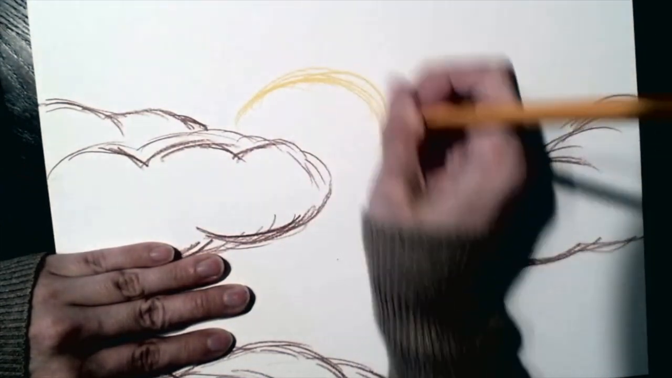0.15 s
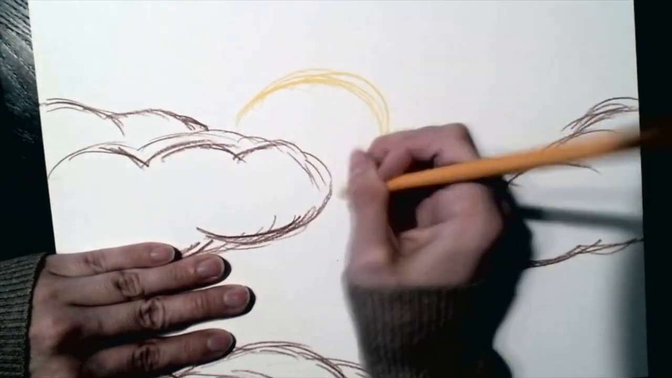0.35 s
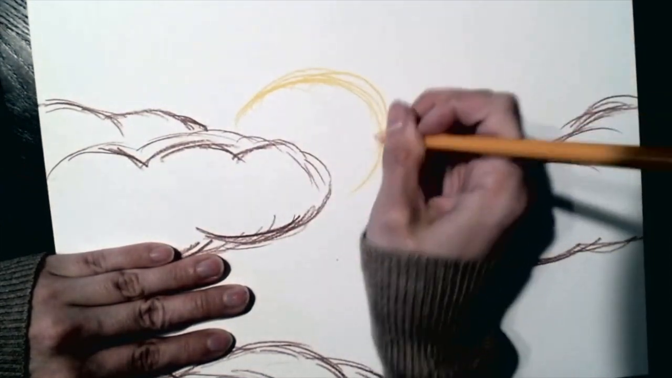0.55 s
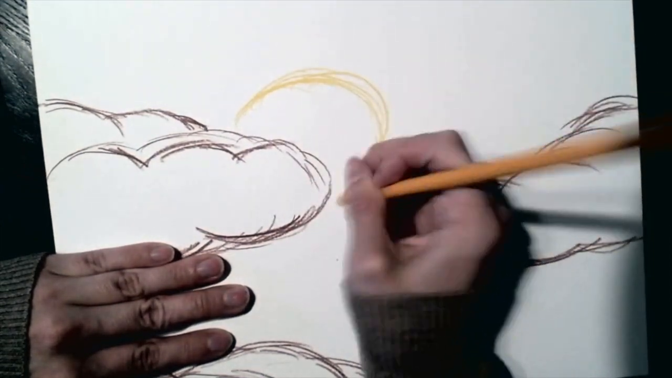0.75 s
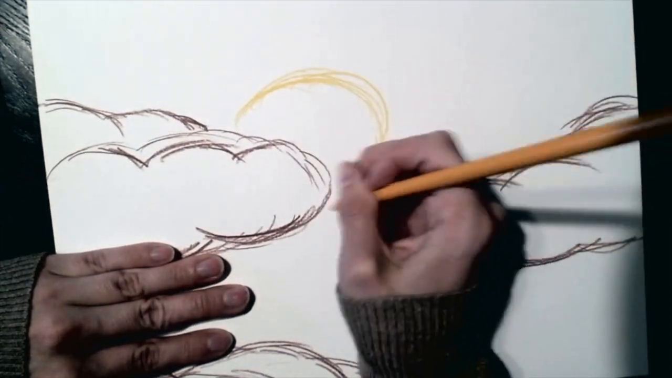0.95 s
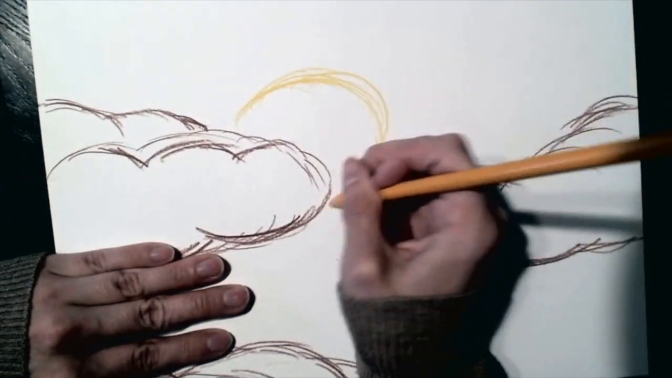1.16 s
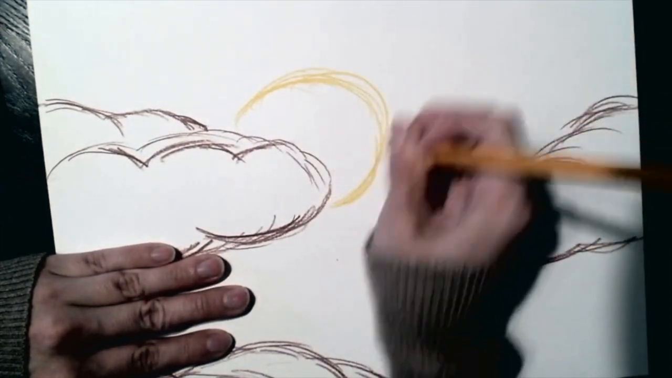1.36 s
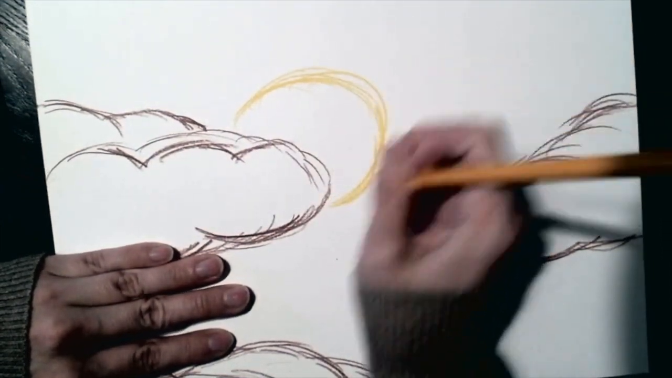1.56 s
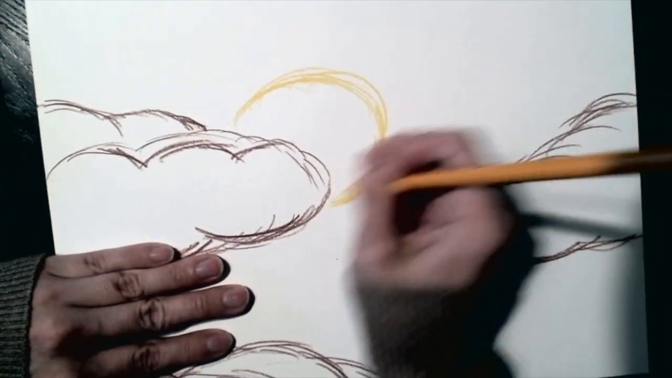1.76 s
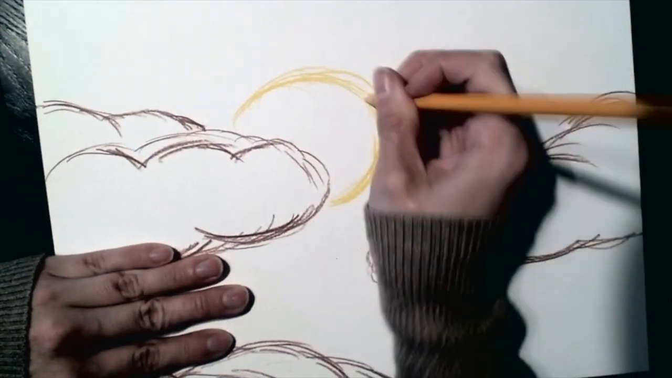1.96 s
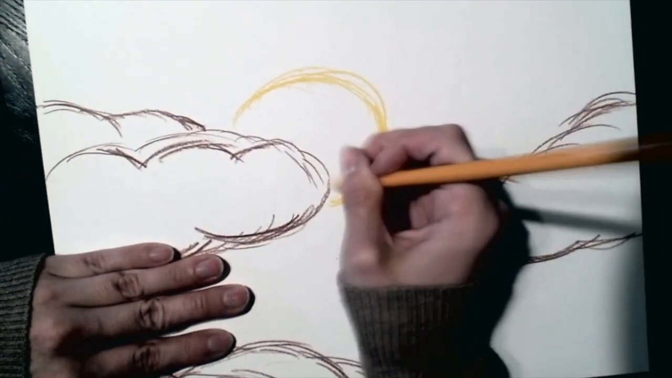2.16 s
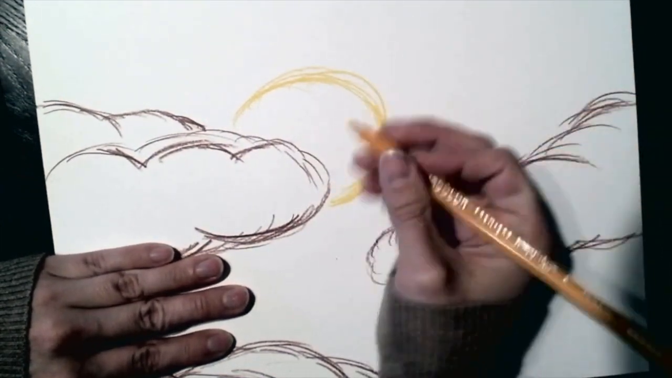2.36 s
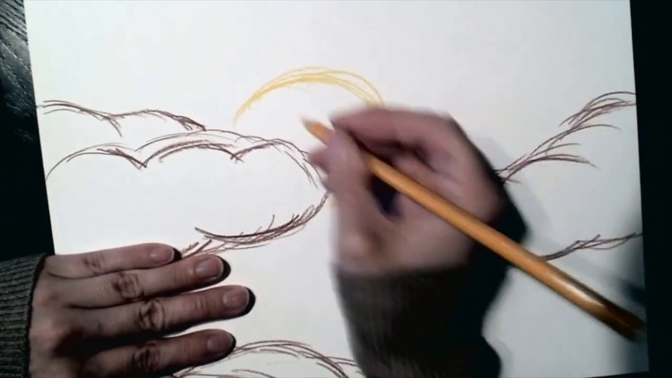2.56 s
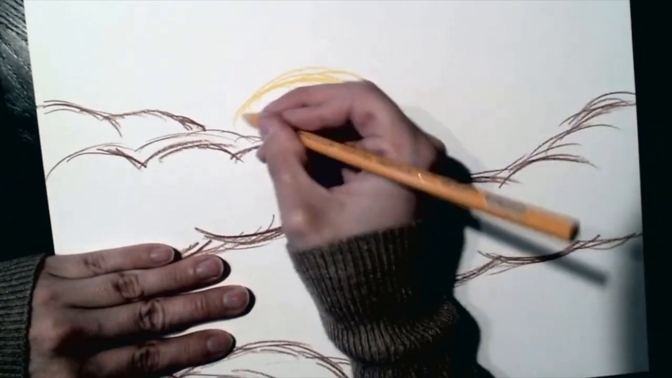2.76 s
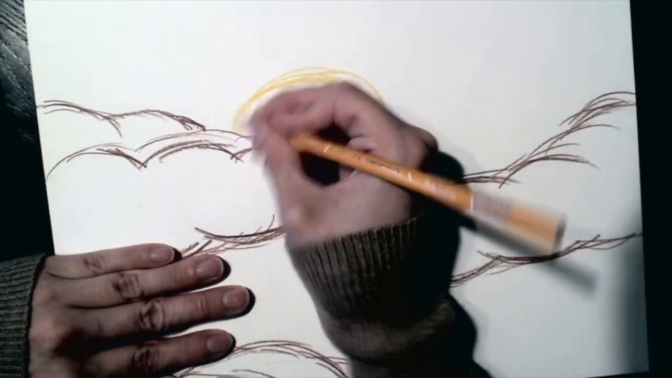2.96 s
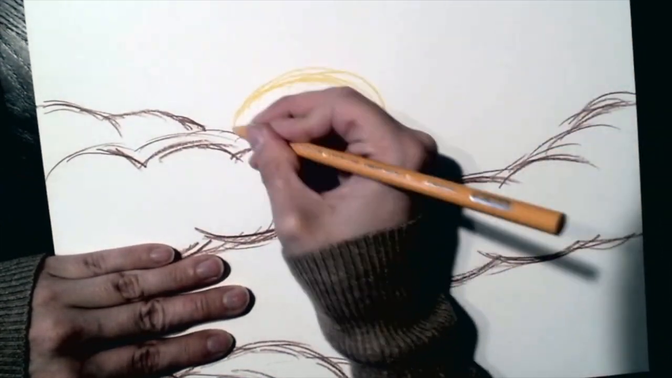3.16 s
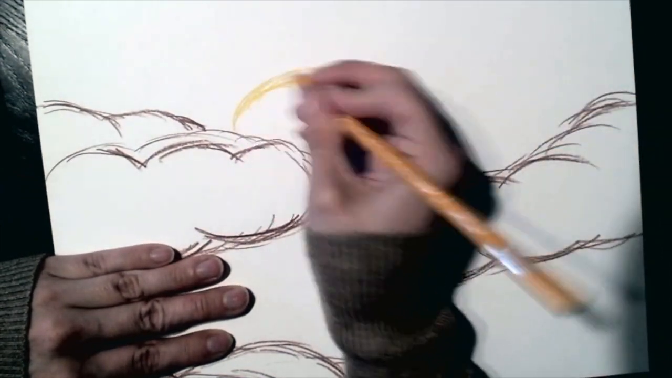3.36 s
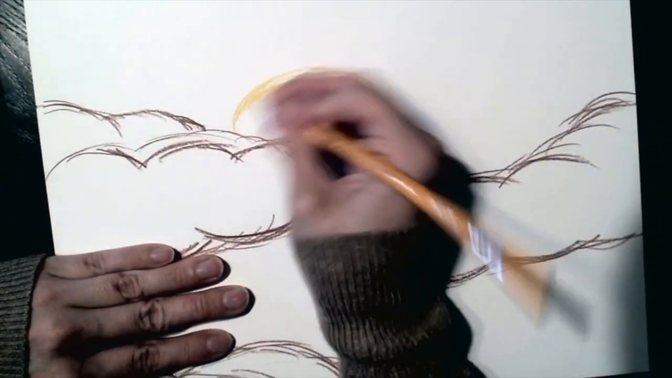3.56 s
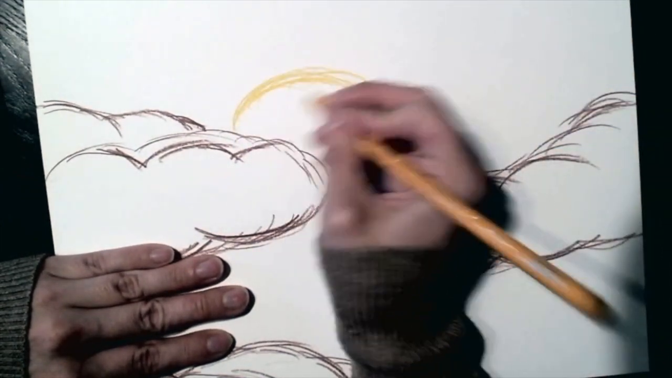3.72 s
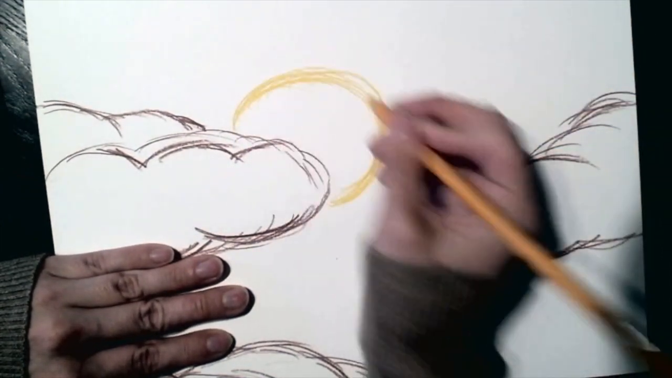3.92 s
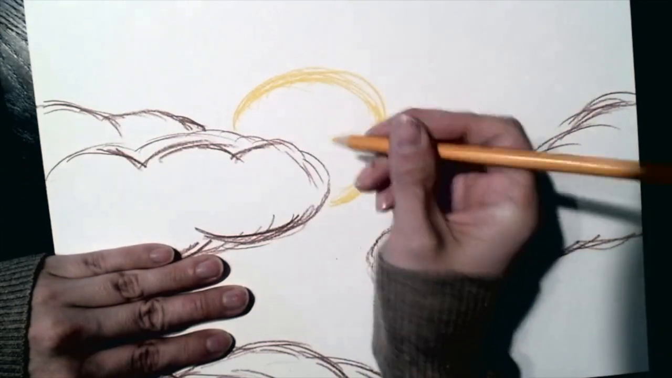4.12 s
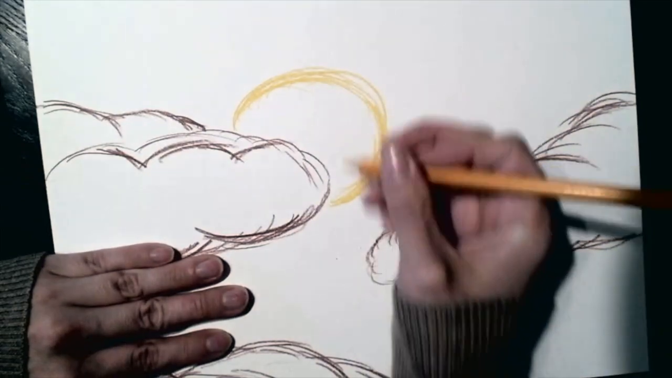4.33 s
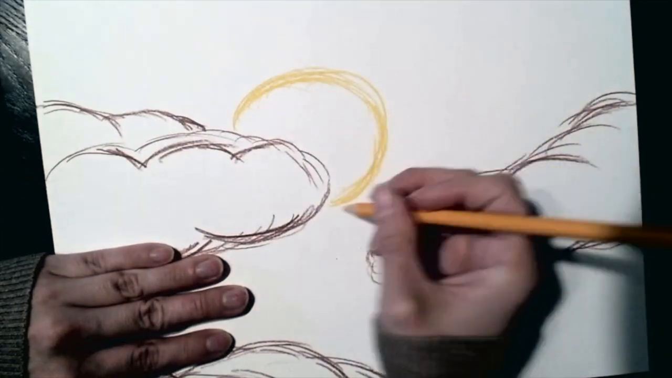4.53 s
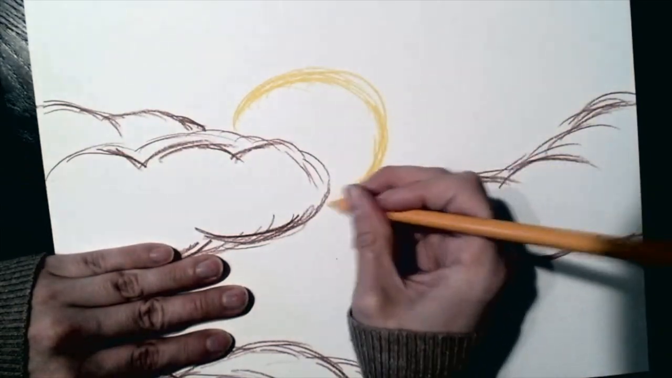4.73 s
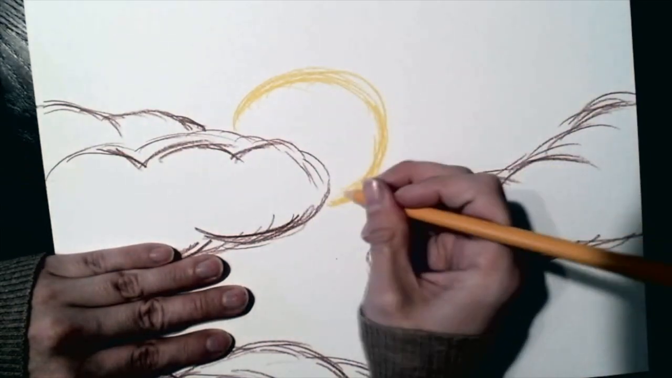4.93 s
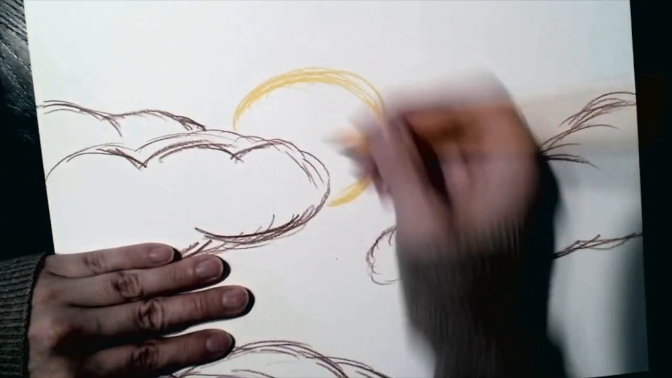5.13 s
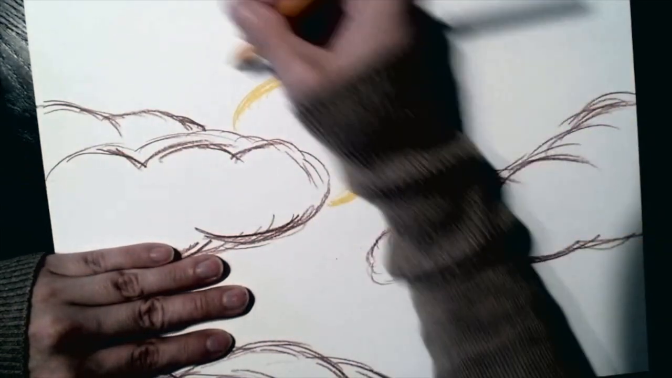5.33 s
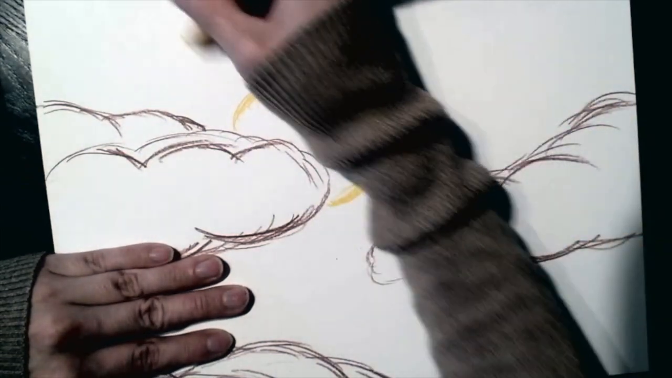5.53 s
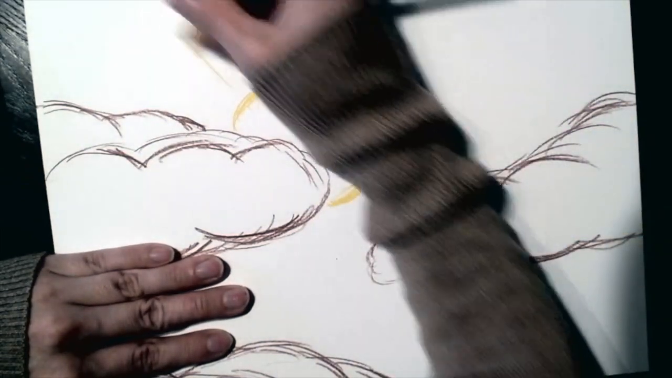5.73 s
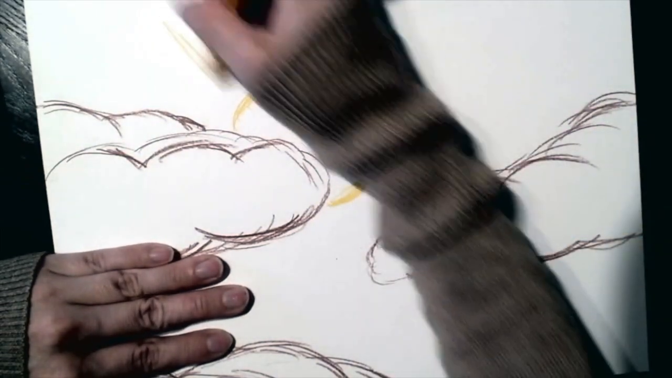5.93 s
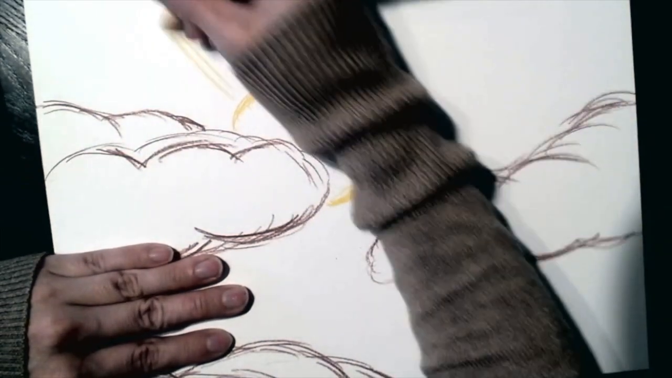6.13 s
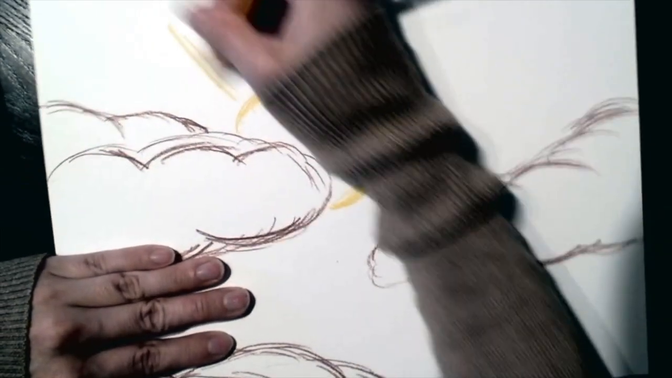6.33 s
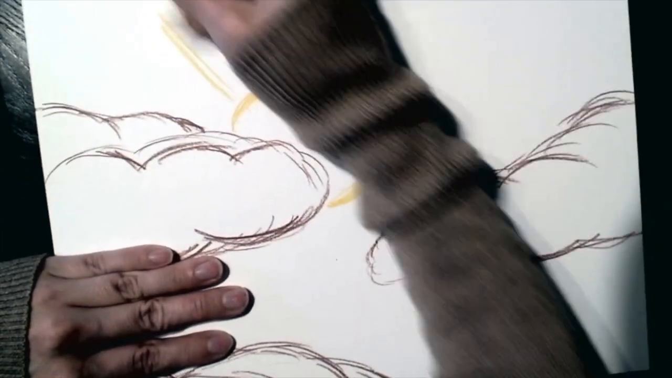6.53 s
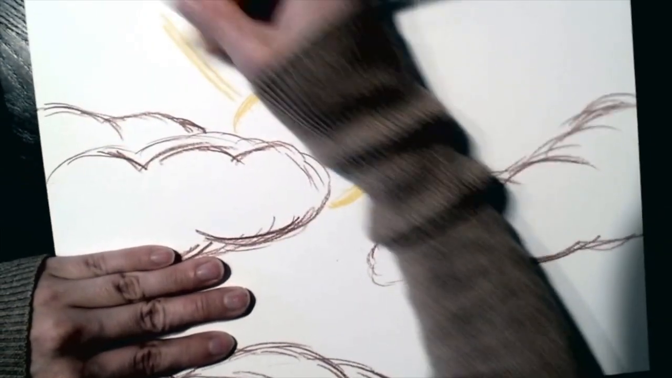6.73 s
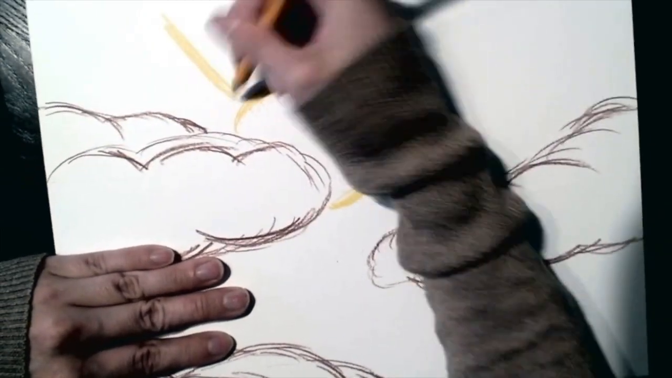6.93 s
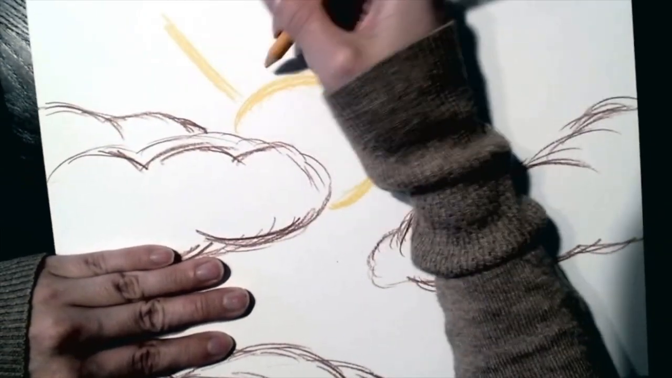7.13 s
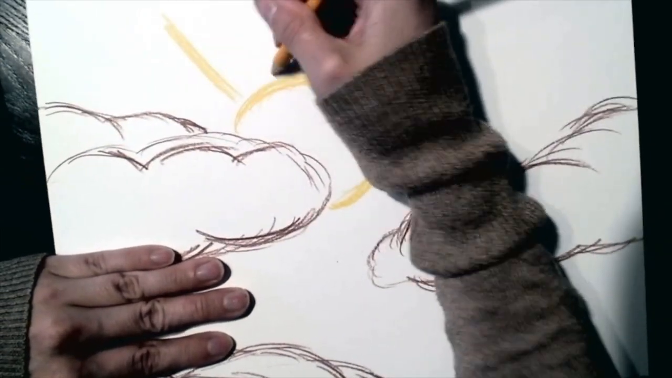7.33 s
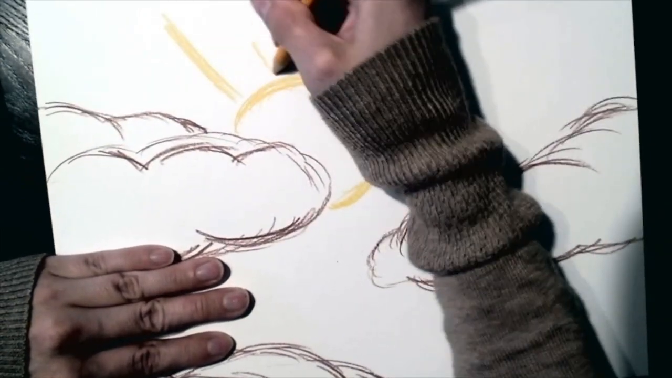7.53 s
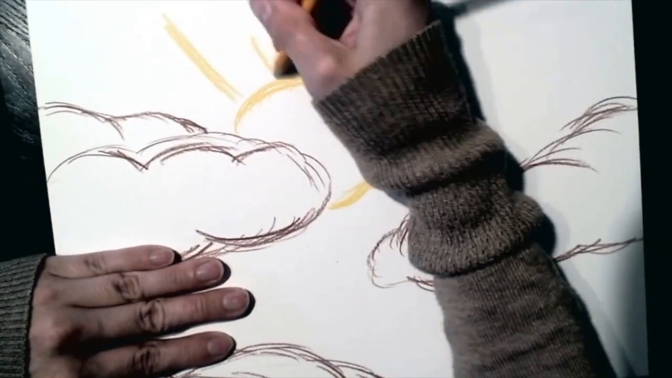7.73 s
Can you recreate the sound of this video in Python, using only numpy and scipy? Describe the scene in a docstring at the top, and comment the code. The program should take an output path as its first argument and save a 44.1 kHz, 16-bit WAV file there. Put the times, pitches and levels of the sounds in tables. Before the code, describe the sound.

A coloured pencil draws on paper over a board, heard close in a quiet room with a faint, low appliance hum throughout. For the first two seconds or so the tip lands with light knocks and sketches about seven arcs, each a grainy hiss that swells and fades over a slight rumble of the board. Hand and sleeve brush softly across the sheet. From about 2.9 to 4 seconds come four more strokes with a few taps, then a lull with only tiny ticks and one faint stroke. Around 5.3 seconds the forearm settles with a soft, deep thud. From 5.5 to 7 seconds the pencil shades briskly to and fro, the loudest strokes, the lead chattering in short rough bursts. After a brief pause, a tap at 7.3 seconds starts shorter, quicker, lighter shading that runs until nearly 8 seconds.

```python
"""A coloured pencil draws on a sheet of paper lying on a board, in a quiet room.
It lands with a knock and sketches arcs, then shades to and fro. Each stroke gathers speed and slows
again: the tip hisses over the fibres, the board rumbles and, in some fast strokes, the lead judders.
Hand and sleeve brush the paper in between, the forearm settles softly, and an appliance hums."""
import sys
import numpy as np
from scipy import signal
from scipy.fft import rfft, irfft
from scipy.io import wavfile

SR = 44100
rng = np.random.default_rng(int(sys.argv[2]) if len(sys.argv) > 2 else 0)


def dump_mix(stems):
    """Bounce the given channels to the path in sys.argv[1] as a 16-bit WAV at rate SR."""
    frames = np.atleast_2d(stems).T  # one column per channel
    limited = np.clip(frames, -1, 1)  # hard clip at full scale
    pcm = np.round(limited * 32767).astype(np.int16)
    wavfile.write(sys.argv[1], SR, pcm)


N = 347508
TIME = np.arange(N) / SR

# Mains hum beating with a motor. Each row: pitch in Hz, level in dB before the ride, wander in radians.
HUM_TONES = [(119.4, -55.5, 0.34), (112, -65, 0.77), (163.8, -71, 1.2), (229.8, -61.5, 0.25),
             (239.3, -68, 1.2)]
# The level of the background hum and low room noise rises and falls, louder around the strokes.
# Each row: time in seconds, gain in dB.
BACKGROUND_RIDE = [(0, -1), (0.9, 0), (1.1, -8.5), (1.45, 0.5), (2.25, 2), (2.45, -4.5), (3.45, -4),
                   (3.7, -1), (4.0, -2.5), (4.2, -7), (5.5, -5), (6.0, 2), (6.9, 3), (7.2, -4.5),
                   (7.88, -1.5)]
# Tone of the still room and of the sliding hand. Each row: frequency in Hz, relative level in dB.
ROOM_COLOUR = [(25, -26), (50, -9), (95, 2.5), (145, 1.5), (240, -2), (320, -4.5), (440, -10), (620, -28.5),
               (850, -23), (1700, -25), (3200, -31), (6500, -34.5), (12500, -43), (14500, -73.5)]
SLIDE_COLOUR = [(300, 3.5), (700, 5), (1300, 8), (2200, 7.5), (3200, 3.5), (7000, 3), (10000, -4),
                (13000, -7), (15000, -38)]
# The hand shifts. Each row: start and end in seconds, fastest point as a share of the move, level in dB.
HAND_SLIDES = [(-0.04, 0.132, 0.39, -67), (0.31, 0.525, 0.26, -69), (0.74, 0.865, 0.5, -69.0),
               (2.12, 2.47, 0.24, -71.5), (2.42, 2.777, 0.76, -71), (3.12, 3.17, 0.7, -76),
               (3.36, 3.518, 0.74, -72), (3.674, 3.773, 1, -66), (3.93, 4.13, 0.14, -73.5),
               (4.303, 4.41, 0.54, -78.5), (4.942, 5.07, 0.6, -77.6), (5.263, 5.522, 0.56, -70),
               (6.864, 7.18, 0.1, -68)]
# Pencil strokes. Each row: start and end in seconds, hardest point as a share of the stroke,
# swell (below 1 flat, above 1 pointed), hiss and rumble in dB before the grip's trims.
STROKES = [(0.112, 0.349, 0.74, 0.74, -59, -51.5), (0.507, 0.764, .62, 0.91, -62, -61),
           (0.85, 1.09, 0.37, 1.3, -65, -63.5), (1.147, 1.473, 0.88, 2.37, -59.5, -52.5),
           (1.465, 1.705, 0.33, 0.46, -59.5, -49.5), (1.703, 1.932, 0.82, 0.38, -58, -51),
           (1.925, 2.184, 0.63, .6, -59.5, -52), (2.904, 3.052, 0.56, 1.3, -66, -47),
           (3.195, 3.405, 0.56, 1.4, -65.5, -48), (3.476, 3.696, 0.52, 1.24, -61, -43.5),
           (3.774, 4, 0.21, 0.61, -61, -52), (4.735, 4.87, 0.3, 0.89, -74.5, -67),
           (5.517, 5.652, 0.5, 0.48, -60.5, -49.5), (5.619, 5.819, 0.89, 1.63, -56.5, -46),
           (5.81, 5.966, 0.52, 0.62, -54.5, -42.5), (5.94, 6.143, 0.79, 1.03, -54.5, -45.5),
           (6.135, 6.31, 0.26, 1.1, -53.5, -42.5), (6.296, 6.465, 0.57, 1.17, -52.5, -43),
           (6.447, 6.647, 0.3, 1.33, -55, -40), (6.62, 6.786, 0.54, 1.3, -54.5, -45.5),
           (6.77, 6.969, 0.17, 2.03, -54.5, -46), (7.317, 7.416, 0.72, 0.88, -66.5, -53.5),
           (7.411, 7.548, 0.092, 1.1, -64, -53.5), (7.527, 7.629, 0.47, 1.25, -63, -49),
           (7.623, 7.745, 0.18, 1.4, -60.5, -49.5), (7.727, 7.833, 0.64, 1.34, -63, -46.5),
           (7.83, 7.905, 0.22, 0.65, -59.5, -49.5)]
# Tone of the friction for each grip: arcs with the side and the top of the lead, long and short shading.
# Each row: frequency in Hz, relative level in dB.
SIDE_ARC_COLOUR = [(650, 4), (880, 0), (1000, 14.5), (1400, 1), (1650, 10.5), (2100, 11), (2650, 3),
                   (3100, -2.5), (4300, 2), (7000, -1.5), (8500, -7), (10300, -3), (13000, -12.5),
                   (15700, -41)]
TOP_ARC_COLOUR = [(930, -2), (1100, 4.5), (1520, 13), (1680, 2), (2100, 13), (2550, 3), (2750, 9.5),
                  (3150, 2), (4300, 2.5), (5900, -1.5), (6900, 2.5), (8400, -7.5), (10300, -4),
                  (15000, -17.5)]
LONG_SHADING_COLOUR = [(870, -1), (1050, 18), (1400, 15.5), (1850, 9.5), (2300, 11.5), (2750, 11.5),
                       (3050, 1), (3500, 3), (5000, 3), (5600, -3.5), (6800, 4), (8200, -2.5),
                       (12500, -6.5), (15700, -13)]
SHORT_SHADING_COLOUR = [(880, 8), (1150, 17.5), (1380, 16.5), (1650, 8.5), (2120, 14), (2800, 7),
                        (3300, -1), (4300, 4), (5700, -3), (6800, 8), (8200, -3), (9500, 0), (15700, -12.5)]
# The board's resonances. Each row: pitch in Hz, bandwidth in Hz, gain in dB.
BOARD_MODES = [(198, 22.4, -10.5), (258.7, 91.5, -1), (375.1, 47, -3.5), (571, 38, -16), (779, 86, -8.5),
               (1110, 26.4, -10), (1159, 88, -7.5), (1315, 114, -5), (1517, 65, -5.5), (1770, 190, -17)]
# The tip lands. Each row: time in seconds, strength in dB, contact cutoff in Hz, then trims in dB
# for the tick of the lead and for the board's lowest, middle and upper modes.
LANDINGS = [(0.1226, 24.5, 505, -46, -5, 7, 4), (0.527, 21, 547, -50, -6, 5.5, 2),
            (0.875, 28.5, 980, -52, -8, -6.5, 3.5), (1.183, 4, 635, -39, 0.5, 4, 17),
            (3.194, 17, 606, -44, 5, 0, 12.5), (3.493, 24, 1350, -48.5, -1, -14, -10),
            (3.7855, 26.5, 1540, -43, -1, -4, -3), (3.849, 13.5, 600, -48, -14, -2, 2),
            (4.505, -17, 1700, -38, -8, -2, -3), (4.725, -3.5, 860, -31, 5, -15, 0),
            (5.483, 10, 1130, -43.5, 4, -3, -5.5), (7.3198, 16, 1207, -45, 0, -9, 2)]
# Rebounds of a hard landing. Each row: delay in seconds, drop below the landing in dB.
BOUNCES = [(.021, 14.5), (.037, 18.8)]
# The lead chatters. Each row: centre and half length in seconds, level in dB, pitch in Hz.
JUDDERS = [(0.281, 0.029, -46, 1025), (0.664, 0.037, -57, 1076), (1.595, 0.0097, -44, 1000),
           (1.635, 0.0077, -46.5, 1030), (2.103, 0.018, -53, 1020), (5.595, 0.016, -46, 1200),
           (5.743, 0.011, -40, 1080), (5.767, 0.0066, -39.5, 1060), (5.884, 0.032, -42.5, 1130),
           (5.878, 0.017, -42, 2617), (6.062, 0.023, -40, 1123), (6.207, 0.03, -47.5, 1060),
           (6.381, .028, -41.5, 1233), (6.541, 0.035, -50, 1126), (6.716, 0.015, -40.5, 1100),
           (6.831, 0.025, -45, 1100), (6.832, 0.015, -46.5, 2680), (7.785, 0.012, -46.5, 1265)]
# The forearm settles. Each row: time in seconds, level in dB.
ARM_BUMPS = [(5.28, -59), (6.0, -56)]


def from_db(db):
    """Decibels to gain."""
    return 10 ** (np.asarray(db) / 20)


def rms_one(x):
    """Scale to unit power."""
    return x / np.sqrt(np.mean(x ** 2) + 1e-20)


def drift(rate):
    """A random wobble of unit power that takes a new value rate times a second."""
    knots = rng.standard_normal(N // 8)
    return rms_one(np.interp(TIME * rate, np.arange(len(knots)), knots))


def butter(x, hz, kind, order):
    """Causal Butterworth filter."""
    sections = signal.butter(order, np.clip(hz, 10, .45 * SR), kind, fs=SR, output="sos")
    return signal.sosfilt(sections, x + 1e-18)


def colour(x, points):
    """Shape a steady noise with an EQ curve."""
    hz, db = np.transpose(points)
    curve_db = np.interp(np.log(np.fft.rfftfreq(N, 1 / SR) + 1), np.log(hz), db)
    return irfft(rfft(x) * from_db(curve_db), N)


def unit_treble(x):
    """Scale a hiss so that its treble has unit power."""
    return x / np.std(butter(x, [3200, 12000], "band", order=4))


def resonate(x, hz, width_hz):
    """One resonance with unity gain at its peak."""
    radius = np.exp(-np.pi * width_hz / SR)
    feedback = [1, -2 * radius * np.cos(2 * np.pi * hz / SR), radius ** 2]
    return signal.lfilter(np.array([1, 0, -1]) * (1 - radius ** 2) / 2, feedback, x + 1e-18)


def arch(start, end, crest):
    """A movement builds to its crest and comes to rest again: 0 to 1 to 0."""
    turn = start + np.clip(crest, .05, .95) * (end - start)
    return np.sin(np.pi / 2 * np.interp(TIME, [start, turn, end], [0, 1, 0]))


def hum_and_room_tone():
    """Background hum, a thin whine and low room noise rise and fall in level over steady faint air."""
    hum = sum(from_db(db) * np.sqrt(2) * np.sin(2 * np.pi * hz * TIME + wander * drift(4))
              for hz, db, wander in HUM_TONES)
    whine = from_db(-78) * np.sin(2 * np.pi * 2724 * TIME + 1.7 * drift(5.8))
    air = from_db(-59) * rms_one(colour(rng.standard_normal(N), ROOM_COLOUR))
    low_air = butter(air, 490, "low", order=1)
    ride = from_db(np.interp(TIME, *np.transpose(BACKGROUND_RIDE)))
    return ride * (hum + whine + low_air) + (air - low_air)


def paper_tooth(grain_db, grains_per_s, patchy_db):
    """Grainy noise, like the drag of paper fibres: countless tiny catches, uneven from patch to patch."""
    catches = rng.standard_normal(N)
    texture_db = grain_db * np.minimum(drift(grains_per_s), 2.5) + patchy_db * drift(110)
    return rms_one(catches * from_db(texture_db))


def hand_slides():
    """Skin and wool brush the paper each time the hand shifts."""
    motion = sum(from_db(db) * arch(start, end, crest) ** 0.75 for start, end, crest, db in HAND_SLIDES)
    brush = paper_tooth(grain_db=-1.5, grains_per_s=1300, patchy_db=0.3)
    return motion * unit_treble(colour(brush, SLIDE_COLOUR))


def stroke_envelopes(spans_s, speed_lean=0.56, rumble_power=1.91):
    """Tip speed, friction gain and rumble gain for the strokes that start within the spans."""
    speed, friction, rumble = np.zeros((3, N))
    for start, end, crest, swell, hiss_db, rumble_db in STROKES:
        if any(since <= start < until for since, until in spans_s):
            on = (TIME > start) & (TIME < end)
            fastest = .5 + speed_lean * (crest - .5)   # between mid-stroke and the hardest point
            pace = arch(start, end, fastest)[on]
            speed[on] = np.maximum(speed[on], pace)
            friction[on] += from_db(hiss_db) * arch(start, end, crest)[on] ** swell
            rumble[on] += from_db(rumble_db) * pace ** (swell * rumble_power)
    return speed, friction, rumble


def board(force, lowest_db, middle_db, upper_db):
    """The board rings in its modes, balanced by the place of contact, and radiates little bass."""
    deep, bright = 0, 0
    trims_db, edges_hz = [lowest_db, 0, middle_db, upper_db], [330, 500, 900]
    for hz, width_hz, db in BOARD_MODES:
        group = np.searchsorted(edges_hz, hz)
        ring = from_db(db + trims_db[group]) * resonate(force, hz, width_hz)
        if group < 2:
            deep += ring
        else:
            bright += ring
    scooped = butter(deep, 460, "low", order=4) + butter(bright, 710, "high", order=2)
    return butter(scooped, 164, "high", order=4)


def pencil_strokes(spans_s, tone, hiss_trim_db, rumble_trim_db, modes_db, grain_db, sizzle_db, sizzle_hz):
    """The tip hisses on the paper while its slower bumps shake the board into a rumble."""
    speed, friction, rumble = stroke_envelopes(spans_s)
    scrape = unit_treble(colour(paper_tooth(grain_db, grains_per_s=2200, patchy_db=0.88), tone))
    body = butter(scrape, 3200, "low", order=1)
    treble = scrape - body
    rasp = body * from_db(-7.95 + 6.5 * speed ** 2)   # speed brings out the rasp
    # The lead turns and wears, so the balance of rasp and treble keeps shifting.
    hiss = sum(band * from_db(2.05 * drift(19)) for band in (rasp, treble))
    # A thin, very high sizzle near 15 kHz on the loudest, fastest strokes.
    flicker = paper_tooth(grain_db=4.5, grains_per_s=1500, patchy_db=2.5)
    high_band = rms_one(resonate(flicker, sizzle_hz, width_hz=1300))
    sizzle = from_db(sizzle_db) * high_band * friction / friction.max() * speed
    bumps = butter(paper_tooth(grain_db, grains_per_s=320, patchy_db=0.5), 387, "low", order=2)
    knocking = rms_one(board(bumps, *modes_db))
    rubbing = friction * (from_db(hiss_trim_db) * hiss + sizzle)
    return rubbing + from_db(rumble_trim_db) * rumble * knocking


def pencil_landings(bounce_above_db=25):
    """The lead ticks and knocks the board; a sharper contact rings higher, and the hardest hits bounce."""
    out, click = np.zeros(N + SR), signal.unit_impulse(SR // 3)
    for time_s, db, contact_hz, tick_db, *modes_db in LANDINGS:
        knock = board(butter(click, contact_hz, "low", order=10), *modes_db)
        tick = from_db(tick_db) * butter(click, [1100, 2400], "band", order=1)
        rebounds = list(BOUNCES) if db > bounce_above_db else []
        for delay_s, drop_db in [(0.00059, 0)] + rebounds:
            start = int((time_s + delay_s) * SR)
            out[start:start + len(click)] += from_db(db - drop_db) * (tick - knock)
    return out[:N]


def lead_judders(width_hz=253):
    """The lead sticks and slips, chattering in short, rough bursts, each around one pitch."""
    out = np.zeros(N)
    flutter = from_db(-0.2 * drift(240) + 2.0 * drift(75))
    for centre_s, half_s, db, hz in JUDDERS:
        near = np.abs(TIME - centre_s) < 3 * half_s
        swell = np.exp(-np.abs((TIME[near] - centre_s) / half_s) ** 3 / 2)
        slips = rng.standard_normal(SR // 2)[:len(swell)] * flutter[near]
        burst = swell * resonate(resonate(slips, hz, width_hz), hz, width_hz)
        out[near] += from_db(db) * rms_one(burst) * np.sqrt(np.mean(swell ** 2))
    return butter(out, 876, "high", order=8)


def forearm_bumps(half_s=0.027):
    """The arm settles on the board with soft, deep thuds."""
    weight = sum(from_db(db) * np.exp(-((TIME - time_s) / half_s) ** 2 / 2) for time_s, db in ARM_BUMPS)
    return weight * rms_one(butter(rng.standard_normal(N), [32, 85], "band", order=2))


def room(x, wet_db, t60_s=0.12, build_s=0.0056):
    """Reflections from near walls build up quickly and die away."""
    age = TIME[:SR // 2]
    envelope = from_db(-60 * age / t60_s) * np.clip(age / build_s, 0, 1) ** 2
    tail = rng.standard_normal(len(age)) * envelope
    tail = butter(tail / np.sqrt(np.sum(tail ** 2)), 3500, "low", order=1)
    return x + from_db(wet_db) * signal.fftconvolve(x, tail)[:N]


def scene():
    """The mono mix: pencil in four grips with a touch of room, over hand, arm and hum."""
    side_arcs = pencil_strokes([(0, 2.5), (4.2, 5)], SIDE_ARC_COLOUR,
                               hiss_trim_db=-0.17, rumble_trim_db=3.5,
                               modes_db=(-4, 5, 1), grain_db=0.7, sizzle_db=-11, sizzle_hz=15200)
    top_arcs = pencil_strokes([(2.5, 4.2)], TOP_ARC_COLOUR, hiss_trim_db=-1.1, rumble_trim_db=-2.65,
                              modes_db=(1, -3, 9), grain_db=1.5, sizzle_db=-15.5, sizzle_hz=15000)
    long_shade = pencil_strokes([(5, 7.1)], LONG_SHADING_COLOUR, hiss_trim_db=-0.8, rumble_trim_db=-0.15,
                                modes_db=(2.5, 7, 3.5), grain_db=1.5, sizzle_db=-9, sizzle_hz=14800)
    short_shade = pencil_strokes([(7.1, 8)], SHORT_SHADING_COLOUR, hiss_trim_db=0, rumble_trim_db=-1.3,
                                 modes_db=(4, 2, 3.5), grain_db=0.4, sizzle_db=-15.5, sizzle_hz=14200)
    drawing = room(side_arcs + top_arcs + long_shade + short_shade + lead_judders(), wet_db=-9)
    knocks = room(pencil_landings(), wet_db=-10.5)
    return (drawing + knocks + hand_slides() + forearm_bumps() + hum_and_room_tone())[None]


def record(dry, cutoff_hz=15750):
    """A steep low-pass takes off the very top."""
    return signal.sosfilt(signal.ellip(12, .1, 80, cutoff_hz, fs=SR, output="sos"), dry)


dry = scene()
out = record(dry)
dump_mix(out)
```